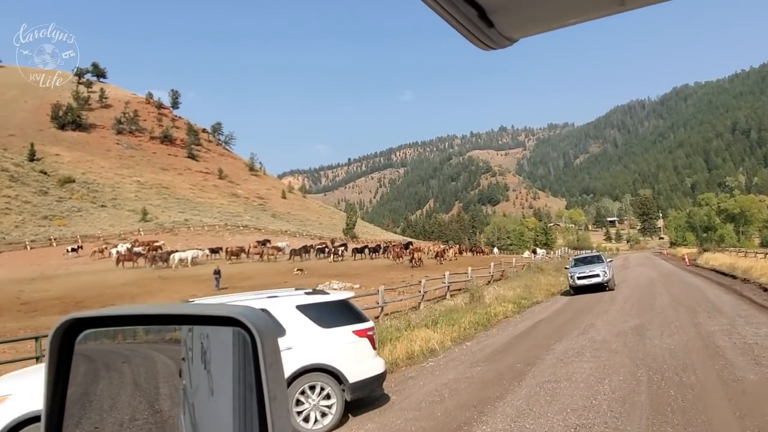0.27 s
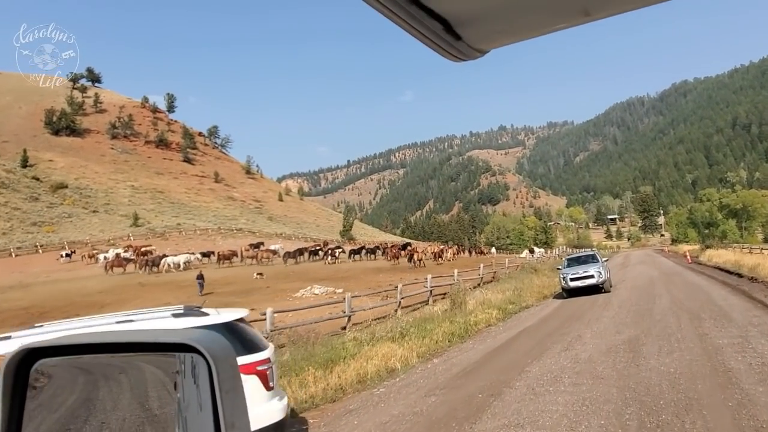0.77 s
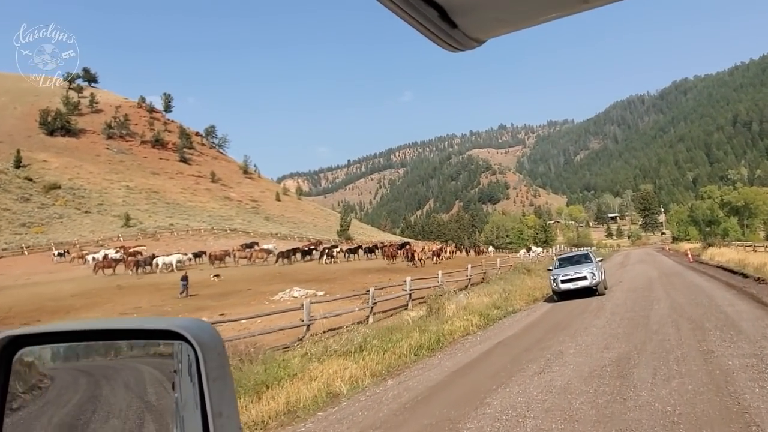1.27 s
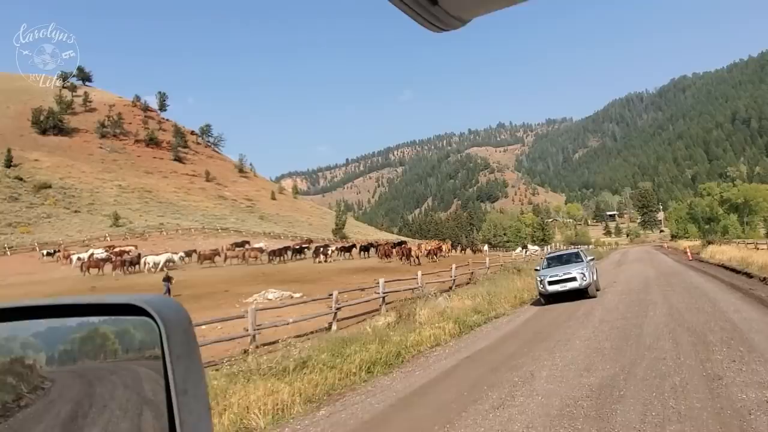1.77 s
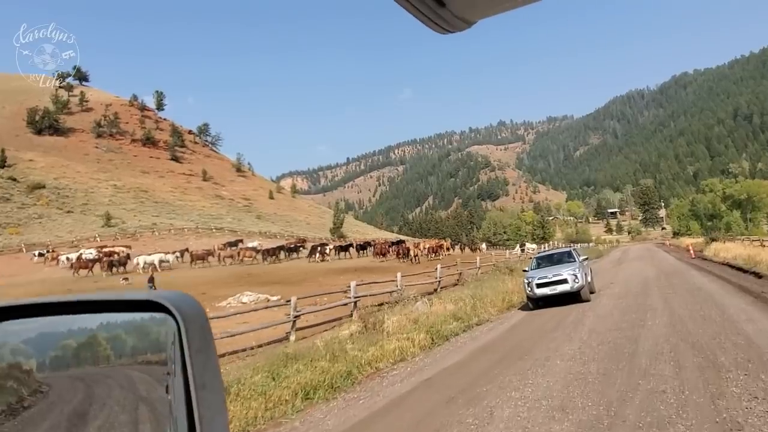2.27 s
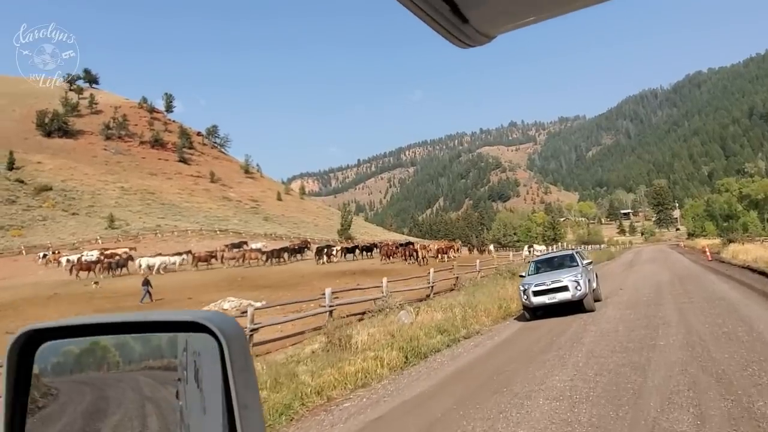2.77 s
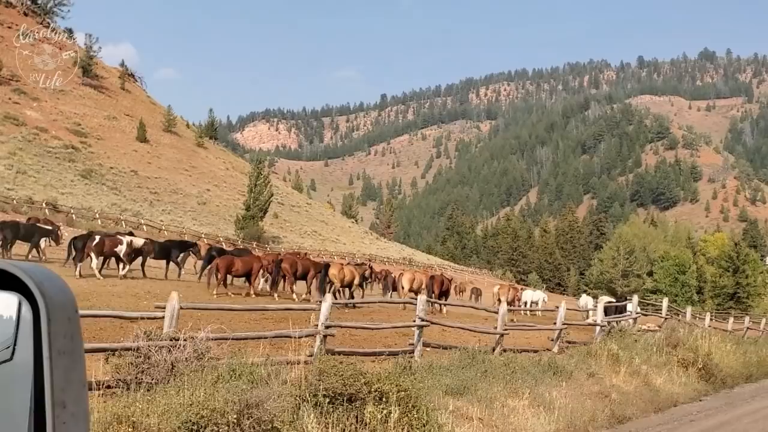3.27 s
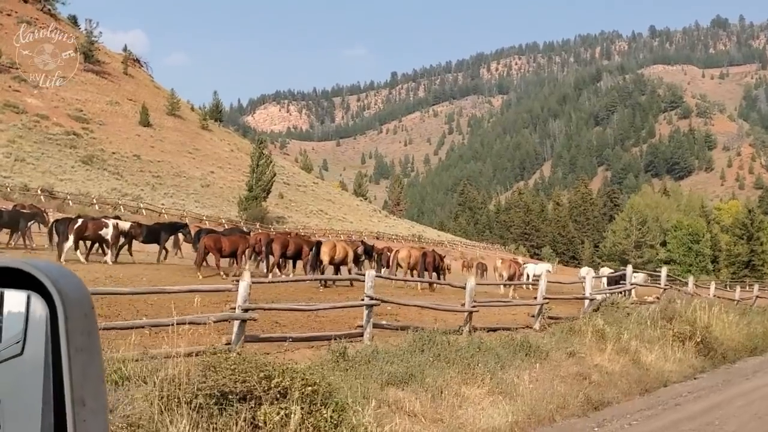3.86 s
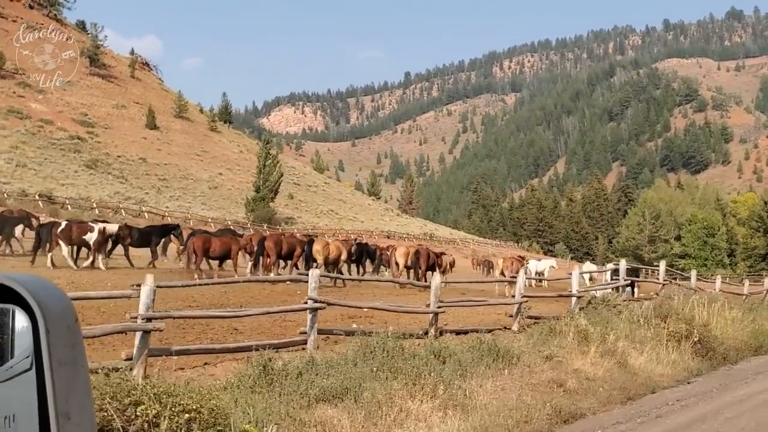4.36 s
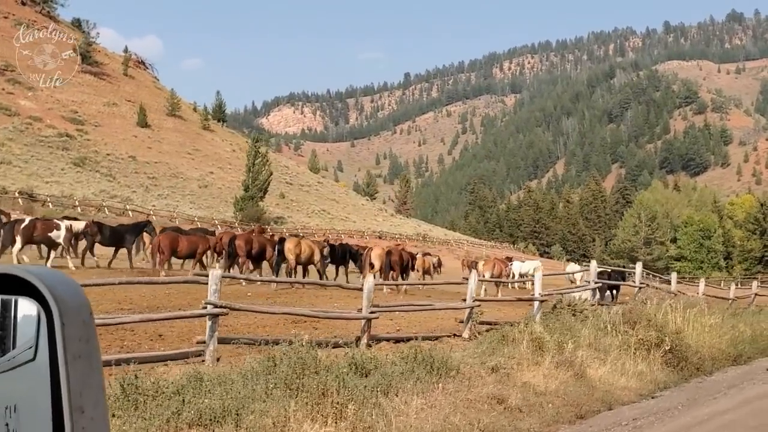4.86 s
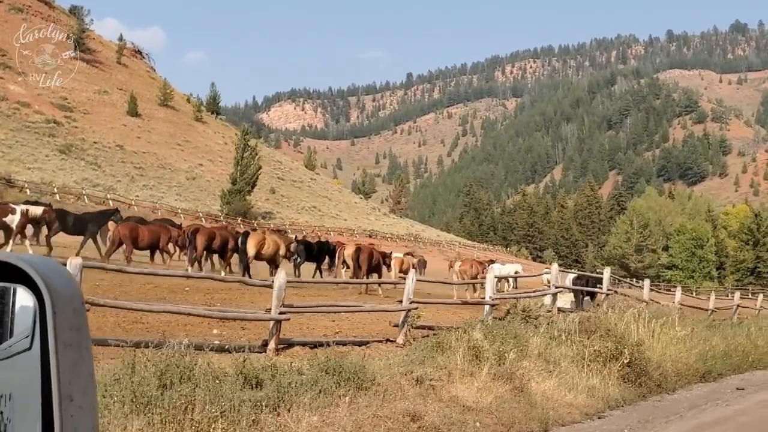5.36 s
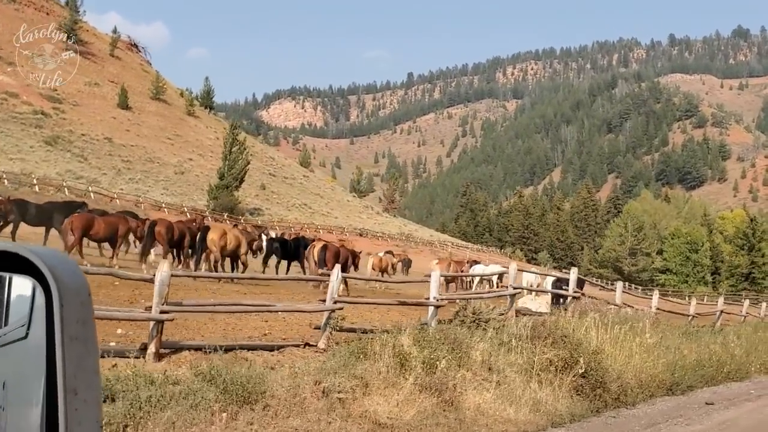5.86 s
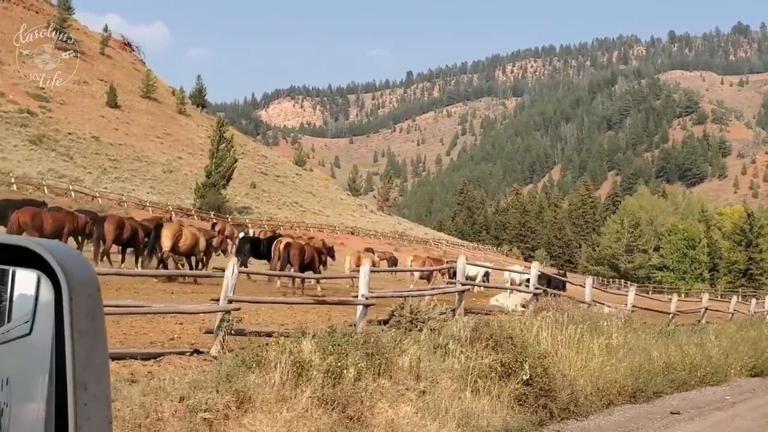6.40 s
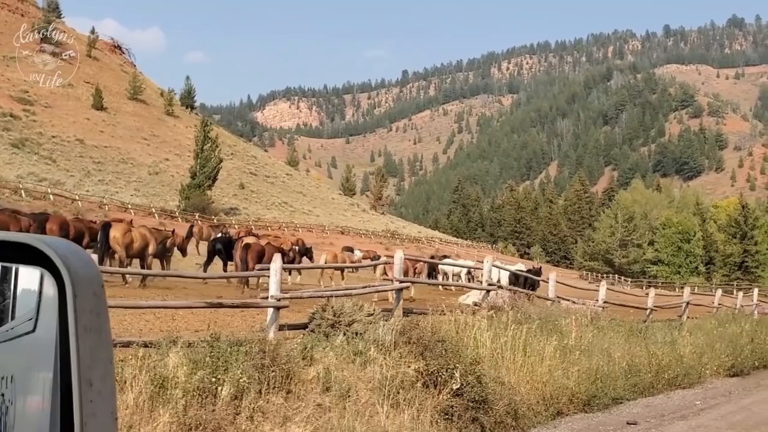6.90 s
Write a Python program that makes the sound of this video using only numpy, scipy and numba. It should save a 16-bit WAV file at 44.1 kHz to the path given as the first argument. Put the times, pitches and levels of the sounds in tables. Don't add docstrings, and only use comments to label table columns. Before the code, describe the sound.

Inside a slow motorhome cab on gravel: low engine drone, tyre rumble, stones knocking the floor, trim rattling, then a cut to steadier droning.

```python
import sys
import numpy as np
from scipy import signal
from scipy.fft import rfft, irfft
from scipy.io import wavfile
from scipy.ndimage import uniform_filter1d
from numba import njit

SR = 44100
rng = np.random.default_rng(int(sys.argv[2]) if len(sys.argv) > 2 else 0)


def pcm_store(signal):
    levels = np.round(np.clip(np.atleast_2d(signal), -1, 1) * 32767)
    wavfile.write(sys.argv[1], SR, levels.astype(np.int16).T)


def invert_db(x):
    u = np.asarray(x, float) / 20
    return 10 ** u


N = 314595
TIME = np.arange(N) / SR
CHANGE_S = 3.24995
LATE = TIME >= CHANGE_S


@njit
def svf(x, hz, width):
    y, b, l = np.empty(len(x)), 0., 0.
    g, k = np.tan(np.pi * hz / SR), width / hz
    for i in range(len(x)):
        v = (b + g * (x[i] - l)) / (1 + g * (g + k))
        b, l, y[i] = 2 * v - b, l + 2 * g * v, k * v
    return y


def svf_twice(x, hz, width):
    return svf(svf(x, hz, width), hz, width)


def unit(x):
    return x / np.sqrt(np.mean(x ** 2))


def walk(rate):
    hold = int(SR / rate)
    steps = np.repeat(rng.standard_normal(N // hold + 1), hold)
    return 0.95 * uniform_filter1d(uniform_filter1d(steps, hold), hold)[:N]


def curves(table):
    s, *columns = np.transpose(table)
    return [np.interp(TIME, s, c) for c in columns]


def read(table, hz):
    table_hz, values = np.transpose(table)
    return np.interp(np.log(hz), np.log(table_hz), values)


def tinted(table, count):
    hz = np.maximum(np.arange(N // 2 + 1) * SR / N, 1)
    return hz, rfft(rng.standard_normal((count, N))) * invert_db(read(table, hz))


def ports(common, own, share, lead=11):
    share = np.clip(share, 0, 1)
    return np.sqrt(share) * np.array([common, np.roll(common, lead)]) + np.sqrt(1 - share) * own


def pan(left_minus_right_db):
    return invert_db(np.outer([0.5, -0.5], left_minus_right_db))


def add(out, s, sound):
    i = int(s * SR)
    out[:, i:i + sound.shape[1]] += sound[:, :N - i]


# (time [s], firing rate [Hz], load as boom level [dB])
ENGINE_RUN = [(0, 48.05, -52), (.4, 42.94, -68), (.9, 43.48, -71), (1.3, 46.8, -49), (1.45, 47.57, -36),
              (1.9, 49.03, -35.5), (2.3, 50.35, -29), (2.55, 51.93, -30.5), (2.85, 51, -31),
              (3.24, 51.17, -30), (3.26, 54.63, -28.5), (3.7, 54.9, -27.5), (4.2, 53.7, -28),
              (5.3, 54.79, -27.5), (7.13, 53.8, -27.5)]
# (time [s], level [dB])
BOOM_FALTERS = [(1.6, -7), (1.645, 4), (1.72, -11), (1.79, 5), (1.99, 8), (2.11, 1), (2.55, 3.5),
                (2.66, -2), (2.8, 8.5), (1.831, -10), (1.935, -5), (2.05, -16), (2.17, -3), (2.46, -7),
                (2.585, -14), (2.76, -3), (3.135, -6), (3.62, -9), (4.05, -10), (4.2, -2), (4.71, -2),
                (5.26, -2.5), (5.46, -4), (5.84, 1), (6.17, -7), (6.33, -1), (6.4, -5), (6.52, -2)]


def engine():
    firing_hz, boom_db = curves(ENGINE_RUN)
    second_db = -45.5 + 0.2 * (boom_db + 29)
    fan_db = np.where(LATE, -45, -49.5) + 0.4 * (firing_hz - 54)
    panel_db = np.maximum(-45.5 - ((firing_hz - 48.75) / 0.21) ** 2, -61)
    falter_s = .018
    falter_db = sum(db * np.exp(-((TIME - s) / falter_s) ** 2) for s, db in BOOM_FALTERS)

    phase = 2 * np.pi * np.cumsum(firing_hz) / SR
    boom = invert_db(boom_db + falter_db + 0.8 * walk(10)) * np.sin(phase + 0.13 * walk(23))
    second = invert_db(second_db + 2.3 * walk(7.7)) * np.sin(2 * phase + .5 * walk(8))
    fan_order = 3.27
    fan = invert_db(fan_db + 2.5 * walk(10)) * np.sin(fan_order * phase + 1.06 * walk(14))
    panel = invert_db(panel_db) * unit(svf(rng.standard_normal(N), 304.2, 5.0))
    sway_db = 1.1 * walk(9.1)
    return ports(np.sqrt(2) * (boom + second + fan) + panel, 0, 1.0) * pan(2 * sway_db - 0.4)


# (time [s], level [dB])
ROUGHNESS = [(0, 6), (.3, 2), (.55, -0.5), (1, -1.5), (1.6, 2), (1.9, 6.5), (3, 6), (3.24, 5.5), (3.26, -2),
             (3.38, -2.5), (4.2, 0), (4.85, -1.8), (5.17, 0.5), (5.4, -2), (6.28, -0.3), (6.5, -2.5),
             (6.75, -1), (7.13, -0.5)]
# (frequency [Hz], level per Hz [dB])
EARLY_COLOUR = [(13, -40), (25, -4), (45, 2.5), (80, 0.5), (150, -3.5), (205, -11.5), (280, -9.5),
                (486, -12), (603, -12), (823, -16), (951, -22), (1180, -19.5), (1950, -28), (2100, -30),
                (3560, -38), (6800, -48.5), (8840, -80), (15000, -120)]
LATE_COLOUR = [(39, -26), (66, -9), (103, -9), (181, -17), (228, -26), (318, -23), (393, -26), (760, -30.5),
               (887, -25.5), (1260, -35.5), (1440, -37.5), (1590, -40), (6800, -65), (8840, -98),
               (15000, -120)]
# (frequency [Hz], level per Hz [dB])
LATE_SUB_BASS = [(22, -8), (40, -25)]
# (frequency [Hz], level under the last colour point [dB])
BODY_SHUT_OFF = [(7050, -3), (9000, -53)]
# (frequency [Hz], share [0-1])
PORT_LIKENESS = [(30, 1.23), (120, 0.73), (230, 0.83), (330, 0.83), (700, 0.73), (1400, 0.63),
                 (2800, -0.45), (5000, -1)]
# (frequency [Hz], left minus right [dB])
PORT_BALANCE = [(60, 4), (110, 0), (200, 2), (380, 1), (700, 1.8), (1290, 1), (2380, 2.5), (4400, -0.5),
                (8120, 9), (15000, -5.6)]


def closed(colour):
    return colour + [(hz, colour[-1][1] + db) for hz, db in BODY_SHUT_OFF]


def road():
    rough_db, = curves(ROUGHNESS)
    crunch_db = 2.52 * np.clip(walk(90), -2, 1.6) + 0.19 * walk(23.85)
    hz, early = tinted(closed(EARLY_COLOUR[:-2]), count=3)
    hz, late = tinted(closed(LATE_SUB_BASS + LATE_COLOUR[1:-2]), count=3)
    roar = (hz > 250) & (hz < 1300)
    early *= invert_db(-46) * N / np.sqrt(2 * np.sum(np.abs(early[0, roar]) ** 2))
    late *= invert_db(-43) * N / np.sqrt(2 * np.sum(np.abs(late[0, roar]) ** 2))

    windy, wind_top_hz = TIME < 1.42, 1100
    calm = np.where(windy, 0.38, 1)
    lumps_db = 4 * windy * np.array([walk(40.36), walk(39.35)])
    out = 0
    for centre in 22 * 2 ** (np.arange(19) / 2):
        band = np.cos(np.pi / 2 * np.clip(2 * np.log2(hz / centre), -1, 1)) ** 2
        common, *own = np.where(LATE, irfft(late * band, N), irfft(early * band, N))
        depth = np.interp(np.log(centre), np.log((110, 600, 3000)), (0.89, 0.54, 0.43))
        swell_db = rough_db * depth
        if centre < 200:
            swell_db = swell_db - 3.5 * windy
        swell_db = swell_db + (1.65 if centre < 1000 else 1.1) * walk(16)
        swell_db = swell_db + 1.0 * walk(45) * min(centre / 1200, 1)
        swell_db = swell_db + crunch_db * min(centre / 1500, 1)
        in_wind = centre < wind_top_hz
        share = read(PORT_LIKENESS, centre) * (calm if in_wind else 1)
        heard = ports(common, np.array(own), share, lead=5 if centre < 900 else 11)
        out = out + invert_db(swell_db) * heard * pan(read(PORT_BALANCE, centre)) * invert_db(lumps_db * in_wind)
    return out


# (time [s], peak level [dB], ring [Hz], left minus right [dB])
SIDE_STONES = [(.055, -37, 745, -8), (0.074, -31.5, 400, -3), (.104, -34.5, 433, -17), (.168, -34, 430, 6),
               (.218, -35, 1030, 0), (0.11, -38.5, 970, 2), (.392, -42, 1250, 0), (0.33, -34, 283, 2),
               (.003, -36, 600, -12), (.245, -40, 630, -10), (0.34, -38, 410, -7), (0.31, -37, 670, -1.5),
               (0.94, -41, 596, 1.5), (.361, -39, 1200, 0), (0.44, -43, 1160, 10), (.396, -33, 426, -6),
               (0.37, -35, 394, -13), (3.719, -43, 555, -15), (5, -36, 430, 10), (5.3, -33, 800, 6),
               (5.279, -33, 480, 5), (3.345, -37, 860, 2.5)]
# (time [s], peak level [dB], ring [Hz])
SEAT_STONES = [(1.263, -35.5, 587), (2.053, -40, 477.7), (2.198, -42, 600), (2.878, -39, 600),
               (4.953, -41, 540), (3.33, -34, 480), (3.36, -36, 858), (3.374, -32.5, 860),
               (3.391, -34, 917), (3.734, -35, 1380), (4.192, -39, 1170), (6.355, -41, 560),
               (5.152, -32, 397), (5.157, -40, 805), (3.611, -31, 525), (3.745, -34, 443),
               (3.836, -34.5, 880), (3.866, -38, 557), (3.924, -31.5, 547), (4.075, -32, 850),
               (4.115, -35.5, 776), (4.454, -31, 761), (4.489, -31.5, 630), (4.524, -30.5, 599),
               (4.584, -30.5, 880), (5.037, -33, 613), (5.159, -30, 610), (5.377, -33.5, 556),
               (5.79, -36, 619.4), (6.227, -33.5, 615.3), (6.382, -39, 800), (3.148, -47, 600),
               (4.774, -36, 946), (5.45, -38.5, 960), (5.065, -37, 955.3), (6.682, -36, 506),
               (6.978, -44, 600), (7.076, -36, 880),
               (.343, -47, 700), (.355, -43, 900), (.366, -44, 1260), (.382, -41, 1310), (.412, -43, 900),
               (.437, -44, 1000), (.53, -39, 694), (.578, -40.5, 690), (3.438, -41, 910),
               (3.507, -38, 624.4), (4.244, -43, 600), (4.284, -42, 664), (4.302, -36, 800),
               (4.557, -38, 695), (4.743, -36, 697), (5.09, -35, 654), (5.144, -39, 890), (5.149, -40, 746),
               (5.163, -35, 746), (5.174, -35, 710), (5.184, -33, 600), (5.263, -39, 600), (5.65, -37, 622),
               (5.682, -36, 900), (5.939, -35.5, 803), (6.134, -40, 727), (6.127, -35, 460),
               (6.204, -37, 800), (6.314, -36, 1170), (6.347, -40, 600), (6.427, -43, 770),
               (6.445, -38, 795), (6.466, -35, 700), (6.583, -46, 819), (6.729, -40, 803),
               (6.12, -39, 1000), (6.215, -38, 1000), (3.96, -36, 520), (.058, -40, 1150), (.13, -39, 750),
               (.2, -39, 600)]
# (ratio to ring [1], level [dB], share of the ring time [1])
FLOOR_MODES = [(1.003, 6, 0.67), (1.351, 8, 0.34), (1.619, -9, 0.87), (1.9, -0.5, 0.41), (2.45, -12, 0.35),
               (3.5, -18, 0.35), (4.3, -35, 0.44)]


def stone_knocks():
    out, t = np.zeros((2, N)), np.arange(4000) / SR
    t60 = 0.055
    seat_pan_db = 3.5
    stones = SIDE_STONES + [(*row, seat_pan_db) for row in SEAT_STONES]
    for s, db, hz, pan_db in stones:
        ring = 0
        for ratio, mode_db, share in FLOOR_MODES:
            turns = ratio * hz * t + rng.random()
            ring = ring + invert_db(mode_db - 60 * t / (share * t60)) * np.sin(2 * np.pi * turns)
        grit_db = -34 - 0.2 * (db + 43)
        grit = unit(svf(svf(rng.standard_normal(len(t)), 1600.0, 2000.0), 1700.0, 2300.0))
        grit = grit * invert_db(grit_db - 60 * t / (0.77 * t60))
        knock = (ring + grit) * (1 - np.exp(-t / 0.0028))
        add(out, s, invert_db(db + 4.5) * ports(knock, 0, 0.32) * pan(pan_db))
    return out


# (time [s], level [dB], left minus right [dB], panel pitch ratio [1], share of ring time [1])
LARGE_STONES = [
    (.3885, -33, -3, .6, .9),
    (5.1518, -26, 2, 1, .55),
    (6.3222, -23.5, 2, 1, 1),
]
# (frequency [Hz], level [dB], t60 [s])
LARGE_MODES = [(480, -11, .05), (614, -3, .08), (807, 0, .055), (974, -9, .06), (1120, -5, .035),
               (1290, -11, .06), (1647, -15, .035), (2105, -11, .025), (2500, -17, .025)]


def big_knocks():
    out, t = np.zeros((2, N)), np.arange(4000) / SR
    for s, db, pan_db, ratio, share in LARGE_STONES:
        ring = 0
        for hz, mode_db, t60 in LARGE_MODES:
            delay_s = .0016 if hz > 900 else .0045
            decay = invert_db(mode_db - 60 * t / (share * t60))
            ring = ring - decay * np.cos(2 * np.pi * ratio * hz * (t - delay_s))
        grit = unit(svf(svf(rng.standard_normal(len(t)), 1300., 1400.), 1300., 1600.))
        grit = grit * invert_db(-13 - 60 * t / .07)
        knock = (ring + grit) * (1 - np.exp(-t / .0014))
        add(out, s, invert_db(db + 3.5) * ports(knock, 0, 1) * pan(pan_db))
    return out


# (time [s], peak level [dB], ring [Hz],
# left minus right [dB])
PORT_BUFFETS = [(0.004, -30, 58, 27), (0.067, -28.5, 87, 24.5), (0.095, -27.5, 66.6, 22),
                (.145, -26, 111, 14), (0.158, -22, 99, 6), (.176, -26.5, 90, 14), (0.171, -28, 221, 2),
                (1.055, -33, 171, 0), (1.12, -31, 155, -7), (1.315, -26, 111, 0), (0.243, -28.5, 65.6, 24),
                (0.26, -32, 69, 14.5), (0.312, -32, 85, 21), (.388, -39, 257, -19), (.4, -34, 178, 12),
                (0.424, -34, 69, 31), (.49, -38.5, 172, 11), (1.025, -28, 55, 3), (0.486, -35, 81, 21),
                (0.686, -32.5, 73.5, -18), (0.753, -24.5, 75.5, 3), (0.785, -23, 87, -1),
                (0.865, -28, 72, -6), (1.035, -31, 98, 4), (1.113, -28.5, 63.6, -14), (1.203, -29, 70.4, 6),
                (1.294, -28.5, 82, -3)]
# (time [s], peak level [dB], ring [Hz], left minus right [dB])
BODY_PANEL_BUMP = (.164, -25, 175, 5)
# (time [s], peak level [dB], ring [Hz], left minus right
# [dB])
RUTS = [(1.781, -32, 78.1, 6), (1.97, -32, 102, 4.0), (2.412, -24, 113, -5), (2.53, -25, 77.9, 10),
        (2.596, -31, 86.1, -0.5), (2.764, -25, 77.9, 0.5), (3.195, -25, 110.2, 0), (3.351, -35, 115, 2),
        (3.488, -24.5, 88.8, 7), (3.566, -33, 105.1, 1), (3.986, -39, 110, -2), (4.147, -29, 98, 4.5),
        (4.258, -27, 113.3, 10), (4.555, -19, 91, 0), (4.888, -35, 104.8, -0.5), (4.966, -29, 78.3, 0.0),
        (5.17, -29, 79, -1), (5.607, -22, 77.8, 1.0), (6.192, -24, 115, 5), (6.321, -34, 102, 1.5),
        (6.543, -28, 78.1, -0.5), (6.638, -31, 78.2, 2.5), (6.742, -30, 98.8, 4), (6.897, -32, 77.5, -3),
        (3.69, -25, 99.8, 1), (3.76, -27, 108, 3), (3.9, -31, 104.8, -2), (4.09, -31, 110, 0),
             (4.39, -38, 105, 0), (4.46, -25, 110, 2), (5.325, -31, 105, 0), (5.745, -28, 116, 0),
             (6.0, -44, 100, -2), (6.1, -29, 104.6, 0), (6.15, -30, 100, 0), (6.25, -30, 105, 0),
             (1.24, -33, 200, 0), (5.95, -33, 200, 0)]


def body_bumps():
    out, t = np.zeros((2, N)), np.arange(4000) / SR
    puff_hz, puff_s = 247.0, 0.0075
    for s, db, hz, pan_db in PORT_BUFFETS + [BODY_PANEL_BUMP] + RUTS:
        swing = np.sin(2 * np.pi * hz * t) * t / 0.0095 * np.exp(1 - t / 0.0091)
        air = rng.standard_normal((2, len(t)))
        rush = np.array([unit(svf_twice(a, puff_hz, 2 * puff_hz)) for a in air])
        puff = invert_db(-19) * rush * t / puff_s * np.exp(1 - t / puff_s)
        add(out, s, invert_db(db - 4.5) * (swing + puff) * pan(pan_db))
    return out


# (frequency [Hz], width [Hz], level [dB])
PEBBLE_PANEL = [(600, 130, 9.5), (880, 200, -10), (1432, 71, 5), (2120, 300, 1.5)]
# (time [s], level [dB])
PATTER_SWELL = [(0, -1), (3.25, 1), (3.26, 0), (3.32, 0), (3.38, 3), (3.45, 4.5), (7.13, -0.5)]


def pebbles():
    pebbles_per_s = 120
    struck = rng.random(N) < pebbles_per_s / SR
    sizes = invert_db(np.minimum(3 * rng.exponential(size=N), 7))
    hits = struck * sizes * np.sign(rng.standard_normal(N))
    hits = np.convolve(hits, np.hanning(30), "same")
    ring = unit(sum(invert_db(db) * svf(hits, float(hz), float(width)) for hz, width, db in PEBBLE_PANEL))
    level_db = curves(PATTER_SWELL)[0] + np.where(LATE, -48, -52)
    return ports(ring * invert_db(level_db), 0, 0.39) * pan(3)


# (time [s], rms level [dB], length [s])
DRAGS = [
    (1.1, -54, 0.057),
    (3.713, -51.5, 0.1),
    (4.177, -54, 0.029),
    (6.305, -45, 0.021),
    (6.43, -57, 0.027),
    (6.831, -54, 0.025),
]


def scrapes():
    out = np.zeros((2, N))
    hz, width_hz = 2130.0, 380.0
    grain = invert_db(4.7 * walk(150))
    common, own = (unit(svf_twice(grain * rng.standard_normal(N), hz, 2 * width_hz)) for _ in range(2))
    rasp = ports(common, own, 0.8)
    for s, db, length in DRAGS:
        i, size = int(s * SR), int(length * SR)
        add(out, s, invert_db(db) * np.sqrt(np.hanning(size)) * rasp[:, i:i + size])
    return out


# (time [s], peak level [dB])
TRIM_TICKS = [
    [(.372, -46.5), (.9113, -44), (.9592, -40), (1.009, -49), (1.17, -46), (1.5623, -42.5), (1.6964, -39.5),
     (1.8976, -38.5), (2.036, -39.5), (2.277, -40.5), (2.419, -42.5), (2.466, -40), (2.791, -42),
     (2.877, -42), (2.917, -39.5), (3.4511, -45.5), (3.6905, -51), (3.946, -47.5), (4.2966, -51),
     (4.7456, -48.5), (4.954, -46.5), (5.855, -52), (6.7246, -45.5), (6.9894, -47.5), (7.0803, -46)],
    [(.867, -47), (3.1637, -51), (4.14, -48.5), (5.1133, -50), (5.166, -52), (5.1761, -50), (5.4211, -49),
     (5.9678, -45.5), (6.917, -53)],
]
# (time [s], peak level [dB])
TRIM_CHATTERS = [
    [(.3202, -51), (.664, -41.5), (1.1218, -43), (1.2062, -41.5), (1.322, -38.5), (2.0847, -36.5),
     (2.5043, -40.5), (6.2547, -43.5), (6.2956, -47)],
    [(3.308, -49.5), (4.259, -44.5), (6.2193, -45.5), (6.9222, -46)],
]


def rattles():
    out = np.zeros((2, N))
    for pieces, length_s in ((TRIM_TICKS, 0.0048), (TRIM_CHATTERS, 0.012)):
        for piece, pitch_hz, spit_db in zip(pieces, (3650, 4650), (-15, -10)):
            for s, db in piece:
                add(out, s, invert_db(db + 1.0) * rattle(db, pitch_hz, spit_db, length_s))
    return out


def rattle(db, pitch_hz, spit_db, length_s):
    t = np.arange(2600) / SR
    hz = pitch_hz * (1 + .03 * rng.standard_normal())
    gaps, drops = rng.random((2, 8))
    starts = np.cumsum(0.002554 + 0.00186 * gaps) - .0028 - 0.002 * gaps[0]
    sizes = np.clip(1.5 - starts / length_s, 0, 1) * invert_db(-4 * drops)
    blows = 0
    for start, size in zip(starts, sizes):
        blows = blows + size * np.clip((t - start) / .0003, 0, 1) * np.exp(-np.abs(t - start) / .0011)
    tail = .22 * np.exp(-t / (.003 + length_s))
    noise = rng.standard_normal((3, len(t)))
    ring, spit = np.zeros((2, len(t))), np.zeros((2, len(t)))
    for port, rub in enumerate(ports(noise[0], noise[1:], 0.1)):
        hit = rub * blows
        plastic = svf(rub * (blows + tail), hz, 740.0) + 0.3 * svf(hit, 1.02 * hz, 300.0)
        ring[port] = plastic + 0.9 * svf(hit, 4560.0, 500.0) + 0.21 * svf(hit, 6200.0, 900.0)
        spit[port] = svf(rub * (blows + 1.9 * tail), 11300.0, 8000.0)
    spit_gain = invert_db(spit_db - 0.13 * (db + 66) + 13)
    return ring / np.abs(ring).max() + spit_gain * spit / np.abs(spit).max()


# (time [s], level [dB], time until damped [s])
METAL_TOUCHES = [
    [(.3, -72, .05), (2.88, -59, 0.036), (2.917, -52, 0.06), (2.995, -56, 0.072), (6.3, -62, 0.028),
     (6.36, -61, 0.023)],
    [(2.992, -60, 0.012), (3.02, -68, .04), (4.33, -64, 0.065), (4.41, -63, .04), (4.555, -63, 0.021),
     (4.685, -62, 0.017), (4.72, -65, 0.042), (5.49, -71, 0.023), (6.08, -65, 0.034), (6.165, -64, .02),
     (6.297, -55, 0.03), (6.35, -57, 0.044), (6.43, -60, 0.021), (6.81, -60, 0.015), (6.84, -68, 0.016),
     (6.935, -64, 0.025), (6.995, -59, 0.035), (7.07, -64, 0.035)],
    [(.322, -59, .03)],
    [(.321, -56, .008)],
    [(.325, -66, .07)],
]


def clinks():
    out, t = np.zeros((2, N)), np.arange(6000) / SR
    for hz, touches in zip((2831, 3515, 9600, 11300, 14000), METAL_TOUCHES):
        for s, db, length in touches:
            fall_db = 60 * t / 0.5 + 60 * np.maximum(t - length, 0) / 0.047
            ring = invert_db(db - fall_db) * np.sin(2 * np.pi * hz * t) * (1 - np.exp(-t / 0.0026))
            add(out, s, ports(ring, 0, 0.64))
    return out * invert_db(2.6 * walk(70))


# (time [s], left level [dB], right level [dB])
PORT_GUSTS = [
    (0, -70, -53),
    (0.301, -48, -61),
    (.6, -54, -69),
    (1.1, -52, -62),
    (1.4, -53, -70),
    (1.6, -91, -99),
]


def gusts():
    out = []
    for db in curves(PORT_GUSTS):
        deep = svf(rng.standard_normal(N), 133.2, 28.0)
        eddies = deep + 0.018 * svf(rng.standard_normal(N), 230.0, 200.0)
        out.append(invert_db(db + 2 * walk(23.3)) * unit(eddies))
    return np.array(out)


# (frequency [Hz], level per Hz [dB])
MICROPHONE_HISS = [(4290, -15), (7300, -9), (10200, -4), (11300, -2.5), (15100, -1), (15700, -3.5)]


def hiss():
    common, *own = irfft(tinted(MICROPHONE_HISS, count=3)[1], N)
    level_db = -67.5 + 1.1 * walk(14) + 2.2 * walk(30)
    return invert_db(level_db) * unit(ports(common, np.array(own), 0.11)) * pan(-2.2)


def scene_change():
    out, t = np.zeros((2, N)), np.arange(2000) / SR
    half = invert_db(-23.5) / 2 * np.exp(-t / 0.001) * np.ones((2, 1))
    add(out, CHANGE_S, half)
    add(out, CHANGE_S - len(t) / SR, -half[:, ::-1])
    return uniform_filter1d(out, size=3)


def scene():
    drive = engine() + road()
    floor = stone_knocks() + big_knocks() + body_bumps() + pebbles() + scrapes()
    loose_parts = rattles() + clinks()
    return drive + floor + loose_parts + gusts() + hiss() + scene_change()


def low_pass(x):
    return signal.sosfilt(signal.butter(12, 15830, fs=SR, output="sos"), x)


def record(dry):
    hz = np.arange(N // 2 + 1) * SR / N
    low_cut_hz, top_hz = 14.1, 15830
    response = (hz < top_hz) * hz ** 2 / (hz ** 2 + low_cut_hz ** 2)
    mix = irfft(rfft(dry) * response, N)
    return low_pass(mix)


dry = scene()
out = record(dry)
pcm_store(out)
```